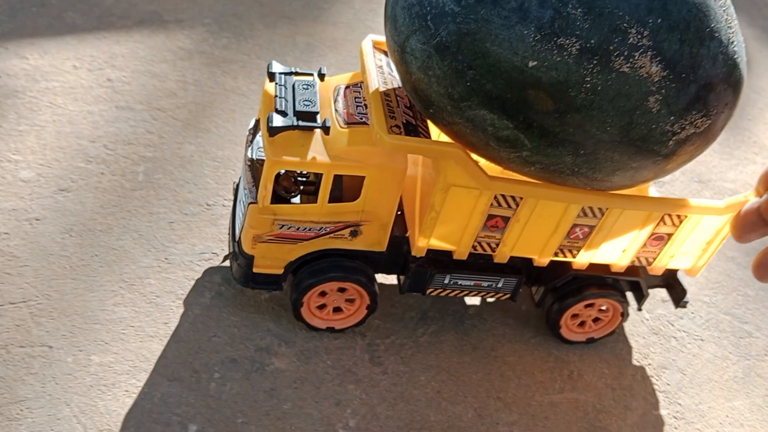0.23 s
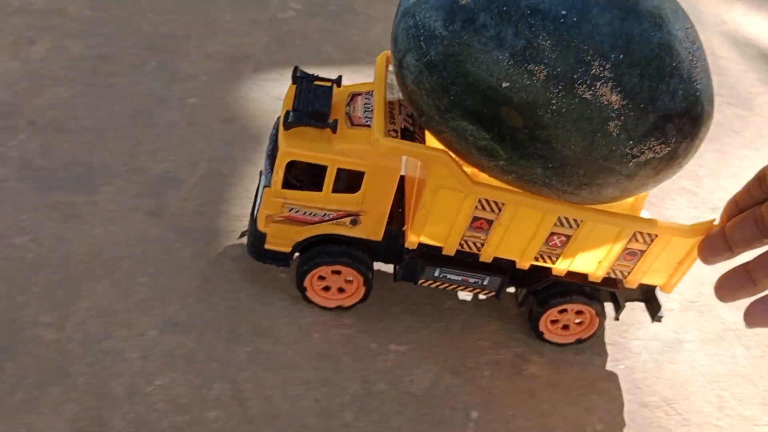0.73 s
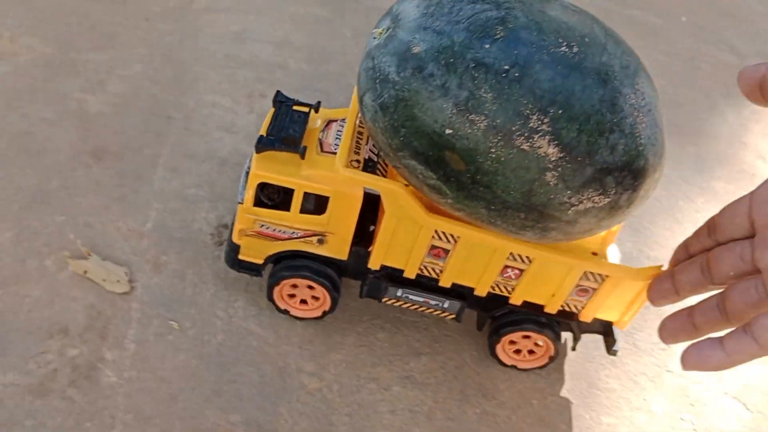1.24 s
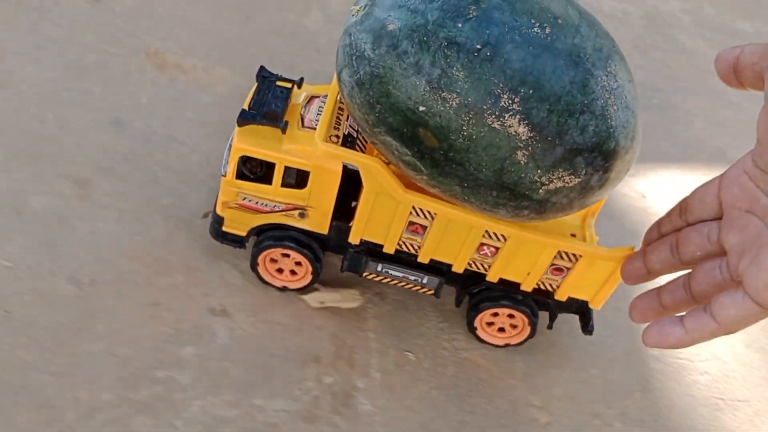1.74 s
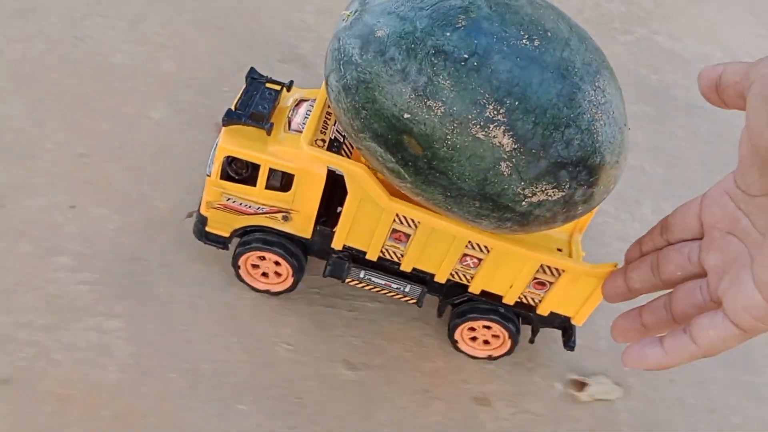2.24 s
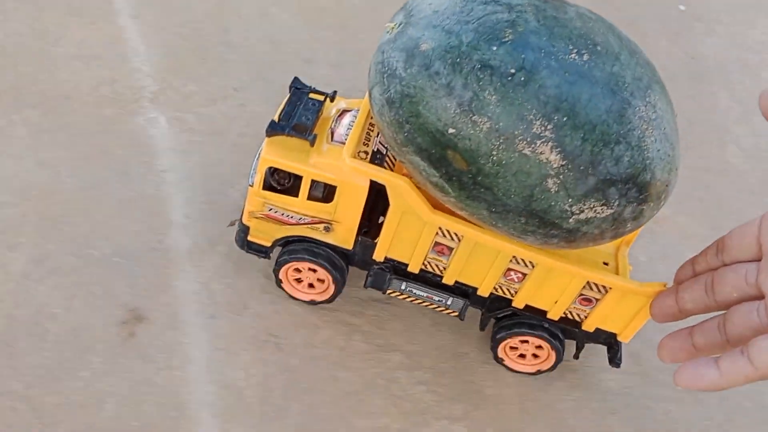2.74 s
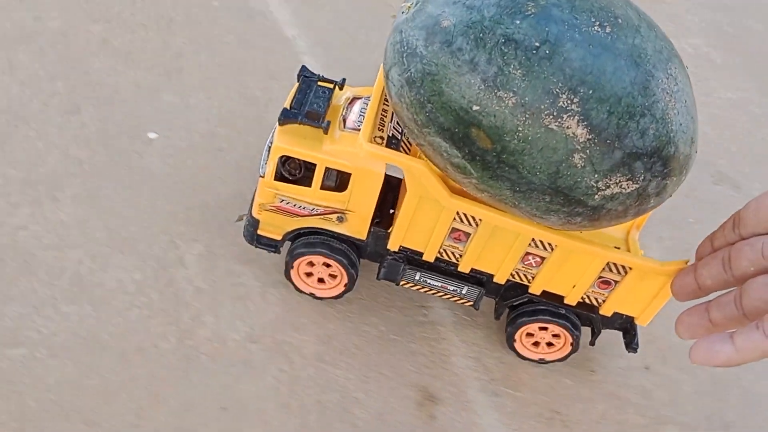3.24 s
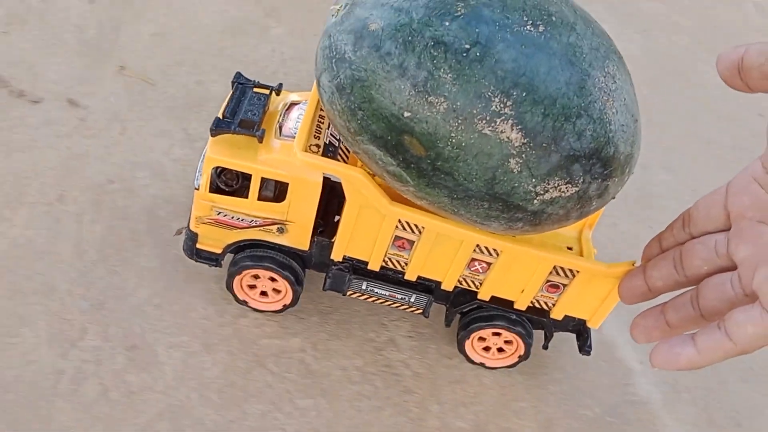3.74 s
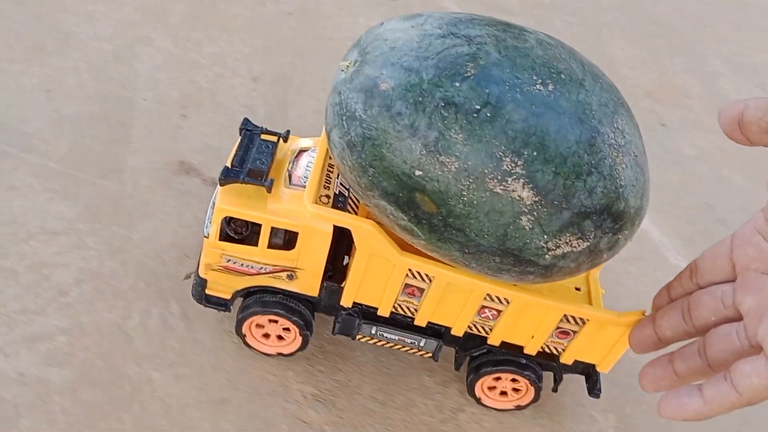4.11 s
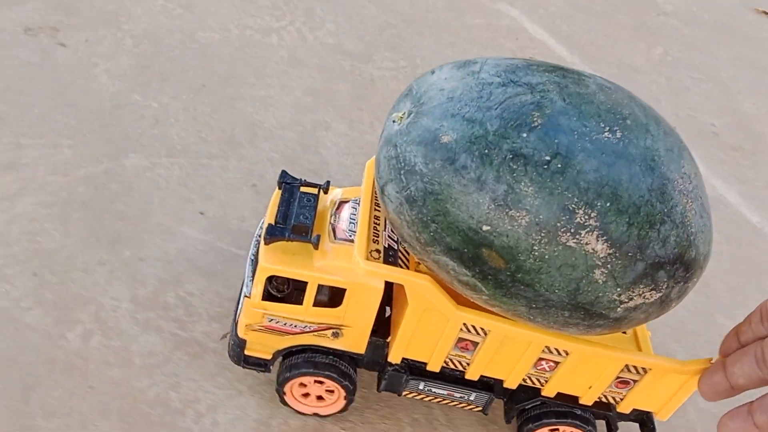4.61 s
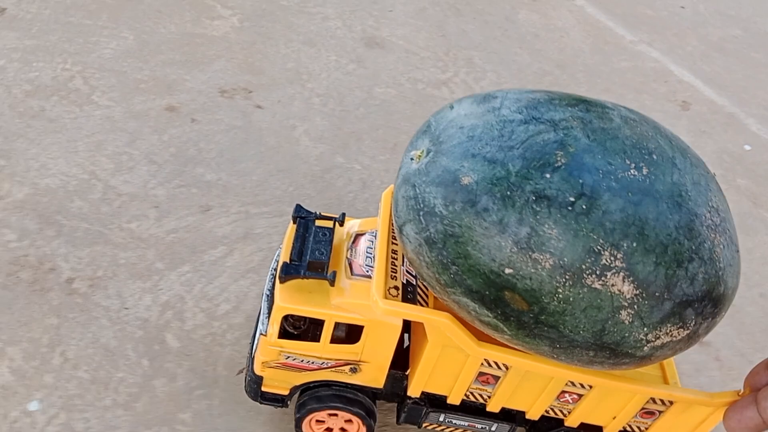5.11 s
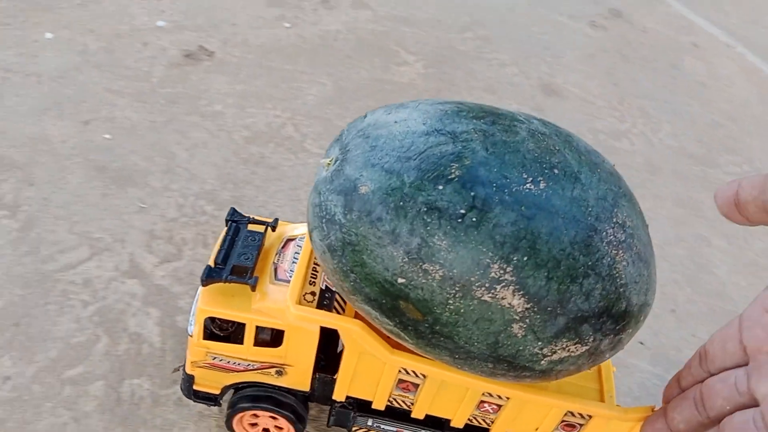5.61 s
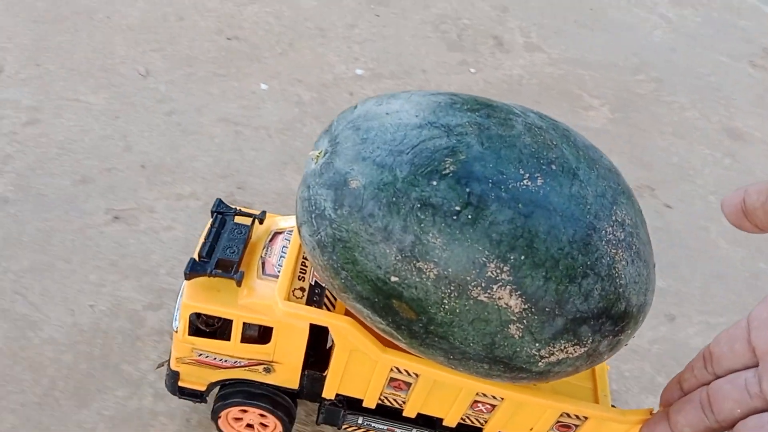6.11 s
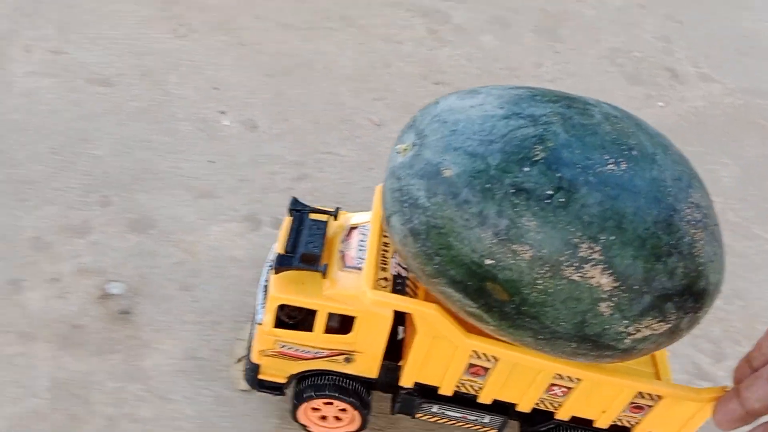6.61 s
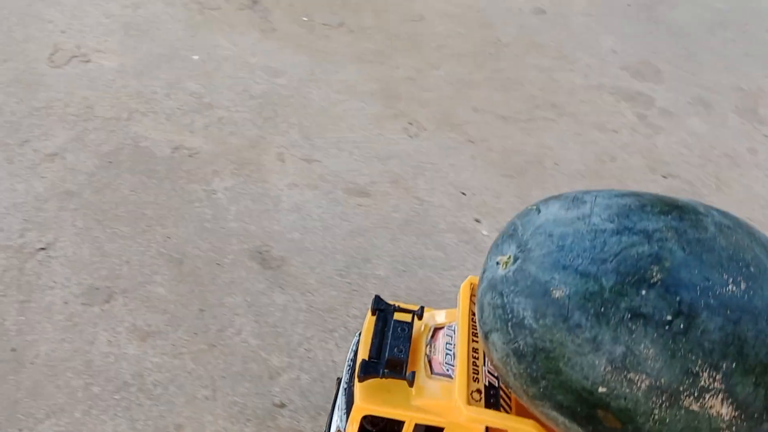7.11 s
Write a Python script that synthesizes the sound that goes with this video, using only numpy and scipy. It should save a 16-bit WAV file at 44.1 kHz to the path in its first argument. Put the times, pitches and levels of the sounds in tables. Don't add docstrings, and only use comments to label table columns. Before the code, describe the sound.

Hard hollow wheels clatter on rough concrete, shaking a thin plastic truck body under a heavy load. First come jerky bursts with small gaps, then about two seconds of continuous grinding rattle, a quiet pause, another steady run, and final brief shoves. Fine grit hisses and ticks, pebbles crack sharply, and faint low rumble sits in the open air, all close to one phone microphone.

```python
import sys
import numpy as np
from scipy import signal
from scipy.fft import rfft, irfft, next_fast_len
from scipy.io import wavfile
from scipy.ndimage import uniform_filter1d, map_coordinates

SR = 44100
rng = np.random.default_rng(int(sys.argv[2]) if len(sys.argv) > 2 else 0)


def convert_level_to_amplitude(level_db):
    exponent = np.asarray(level_db, float) / 20
    return 10 ** exponent


def unload_wav(signal):
    wavfile.write(
        sys.argv[1],
        SR,
        np.round(np.clip(np.atleast_2d(signal).T, -1, 1) * 32767).astype(np.int16),
    )


N = 324135

# (start [s], end [s], level at the start [dB], level at the end [dB])
ROLLS = [(0.096, 0.156, -46, -41), (0.2, 0.262, -55, -46), (0.28, 0.327, -40, -37),
         (0.336, 0.417, -49.5, -42), (0.48, 0.701, -41.5, -37.5), (0.778, 0.915, -39.5, -39),
         (0.978, 1.062, -45.5, -39), (1.261, 1.398, -54, -38), (1.416, 1.515, -36.5, -48.5),
         (1.846, 1.983, -51, -43.5), (2.073, 2.127, -52, -37), (2.129, 3.275, -38.5, -40),
         (3.289, 4.045, -36.5, -40.5), (4.046, 4.436, -42, -42), (4.93, 4.985, -55.5, -52),
         (5.07, 5.238, -50, -37.5), (5.258, 6.065, -39, -37.5), (6.194, 6.436, -41, -37.5),
         (6.768, 7.004, -45.5, -41.5), (7.176, 7.246, -57.5, -40.5), (7.25, 7.296, -38, -37)]
# (start [s], length [s], level [dB])
NUDGES = [(.008, 0.019, -45.5), (0.056, 0.0063, -52.5), (0.722, 0.01, -43), (1.157, 0.051, -55.5),
          (1.229, .03, -60.5), (1.537, 0.018, -59.5), (1.585, 0.019, -61), (1.996, 0.028, -56),
          (1.682, 0.02, -40), (4.661, 0.061, -53.5), (5.013, 0.011, -55.5), (6.067, 0.063, -53.5),
          (4.553, 0.0094, -64), (6.119, 0.011, -57), (6.139, 0.0066, -57), (6.548, 0.033, -71.5),
          (6.625, 0.059, -57.5), (7.108, 0.021, -69), (7.3, 0.057, -52.5)]
# (start [s], length [s], loss [dB])
HITCHES = [(2.199, 0.025, 8), (2.413, 0.021, 7.5), (2.743, 0.052, 2.5), (2.916, 0.017, 2),
           (3.088, 0.063, 11.5), (3.686, 0.056, 9.5), (3.865, 0.027, 5.5), (4.091, 0.017, 10),
           (4.158, 0.081, 1.5), (5.795, 0.029, 11), (5.985, 0.017, 11.5)]
# (time [s], peak level [dB])
JOLTS = [(0.014, -35), (0.05, -45), (0.092, -44), (0.102, -42), (0.184, -52), (0.209, -42), (0.226, -41),
         (0.249, -38), (0.282, -34), (0.371, -41.5), (0.415, -33.5), (0.727, -36), (1.16, -50),
         (1.183, -47), (1.585, -53.5), (1.656, -48), (1.747, -53.5), (1.816, -58), (1.841, -46),
         (1.935, -37), (2.039, -52), (2.069, -44.5), (3.136, -36.5), (4.114, -35), (4.45, -44.5),
         (4.599, -68), (4.627, -64), (4.653, -50), (4.916, -53), (5.09, -42), (6.118, -43), (6.126, -43),
         (6.146, -37.5), (6.185, -35.5), (6.556, -62), (6.613, -52), (6.743, -48), (6.753, -40),
         (6.832, -34.5), (7.069, -67), (7.116, -59.5), (7.164, -53), (7.181, -44), (7.222, -34.5),
         (7.329, -40)]
# (time [s], peak level [dB])
WHEEL_DROPS = [(0.012, -30), (0.094, -53), (0.101, -47), (0.254, -44), (0.41, -27), (0.463, -50),
               (0.474, -28), (.697, -22), (0.755, -32), (.811, -26), (1.051, -24), (1.302, -32),
               (1.506, -35.5), (2.222, -49), (2.545, -18.5), (2.618, -21), (3.155, -44), (3.282, -22),
               (3.499, -18), (3.902, -25), (4.468, -43.5), (4.566, -56), (4.81, -52), (4.85, -47.5),
               (4.973, -28), (5.819, -23), (5.876, -28), (6.019, -23), (6.058, -17.5), (6.185, -51),
               (7.181, -60), (7.22, -36)]
# (middle [s], length [s], gain over its usual share [dB])
LOAD_ROCKS = [(0.24, 0.048, 8), (0.903, .15, -1.5), (2.367, 0.068, 11), (2.707, 0.087, 11.5),
              (3.026, 0.11, 20.5), (3.495, 0.21, 13), (3.95, 0.11, 14.5), (4.284, 0.16, 24),
              (5.437, 0.19, 11.5), (5.705, 0.38, 17), (6.002, 0.1, 4), (6.354, 0.087, 10),
              (6.842, 0.055, 25.5), (7.238, 0.08, 11.5)]

# (frequency [Hz], width [Hz], level [dB])
SHELL = [(1719, 300, 6.5), (2009, 97, 6), (2207, 294, 4.5), (2490, 315, -1), (2726, 157, -0.5),
         (3196, 315, 0.5), (3159, 75, -1.5), (3525, 260, -5), (3738, 320, -13), (4368, 110, -20),
         (4330, 98, -14), (4500, 130, -43), (5420, 160, -32), (5890, 270, -21.5), (6795, 150, -3.5),
         (6790, 136, -10.5), (7700, 790, -16)]
HUBS = [(975, 110, -1), (1040, 120, 0)]
FRAME = [(1190, 170, -2), (1350, 190, 0), (1510, 170, -3)]
CAB = [(643, 82, -1), (866, 306, 10)]
BED = [(500, 70, 0)]
LOAD = [(251, 28, 0), (340, 90, -16)]
# (frequency [Hz], width [Hz], level [dB])
BED_LOOSE = [(589, 85, 3.5), (384, 90, -16)]

# (time [s], level against the push [dB])
LEAN = [(0, -6), (.37, -13), (.6, -10), (1.1, -6.5), (1.3, -1.5), (2.0, -6), (2.2, -12.5), (2.5, -7.5),
        (2.8, -1), (3.2, 0), (3.65, -11.5), (4.4, 0.5), (5.1, -9.5), (5.7, -10), (5.9, 0.5), (6.5, -5),
        (6.7, -5), (7.35, -10)]
# (time [s], level against the push [dB])
SEAT = [(0, -21), (.5, -30.5), (.88, -11.5), (1.0, -19), (1.5, -18), (1.7, -16), (1.9, -28), (2.2, -16),
        (2.6, -7.5), (3.2, -25), (3.5, -8), (3.95, -12), (4.1, -19), (4.4, -9.5), (4.7, -21.5),
        (5.85, -7.5), (6.2, -12.5), (6.5, -8), (7.35, -13)]
# (time [s], level [dB])
FACING = [(0, -2.5), (1.0, -1), (1.2, 3.5), (1.5, -2), (2.8, -0.5), (3.6, -1), (5.4, -0.5), (6.4, -1),
          (6.6, 4.5), (7.03, 0), (7.18, -1), (7.35, 2.5)]
# (time [s], level [dB])
FINGERS = [
    (0, 10),
    (1.15, 7),
    (1.7, -6),
    (2.1, 4.5),
    (3.2, 5.5),
    (3.7, 0.5),
    (5.1, 3),
    (6.2, 4),
    (7.0, 2.5),
]

# (time [s], level against the push [dB])
GRIT = [
    (0, -16.5),
    (1.2, -14.5),
    (2.5, -14.5),
    (4.4, -15),
    (5.3, -15.5),
    (6.0, -16.5),
    (6.8, -9),
    (7.35, -14.5),
]
# (frequency [Hz], level per Hz [dB])
CRUNCH = [(3820, -34), (6500, -8.5), (7600, -6.5), (10000, 2), (11700, -1), (13300, -3), (14000, -13),
          (15600, -7.5)]
# (time [s], peak level [dB], pitch [Hz])
STONE_SNAPS = [(.2808, -52, 10100), (.5786, -33, 8600), (.601, -36, 6550), (.6854, -31.5, 7340),
               (1.3024, -32, 11800), (1.3633, -38, 11300), (1.502, -37, 13000), (1.7874, -40, 7300),
               (2.09, -42, 7000), (2.136, -35, 9350), (2.2972, -31, 11900), (2.449, -31.5, 11000),
               (2.5444, -30, 12300), (2.616, -32, 11750), (2.6803, -29, 12000), (2.6801, -23.5, 5560),
               (2.6805, -34, 7200), (2.796, -29.5, 7700), (3.019, -32, 10700), (3.2136, -37, 10800),
               (3.2137, -37, 7000), (3.754, -32, 11000), (3.839, -34, 10100), (4.4513, -39, 10400),
               (4.5518, -29, 7710), (4.552, -36, 13600), (4.7227, -37, 7700), (4.846, -48, 10400),
               (5.468, -33, 12800), (5.479, -28, 7950), (5.488, -26, 7150), (5.6141, -31, 12550),
               (5.8223, -36, 9900), (6.331, -28, 11200), (6.3315, -41, 5200), (6.3312, -40, 6900),
               (7.209, -40, 12100), (7.2085, -40, 5000)]
# (time [s], peak level [dB], pitch [Hz])
GRIT_TICKS = [(0.0921, -44, 10500), (0.1216, -46, 10700), (0.1374, -57, 10500), (0.185, -51, 10100),
              (0.3304, -44, 10500), (0.3929, -47, 10000), (0.4682, -46, 10000), (0.7251, -39, 11700),
              (0.8239, -44, 10200), (0.9003, -44, 10100), (1.027, -53, 7040), (1.1417, -53, 10300),
              (1.229, -53, 10200), (1.4465, -43, 10100), (2.176, -44, 10100), (2.2302, -45, 10800),
              (2.4936, -39, 11600), (2.7002, -38, 11700), (2.8743, -47, 10800), (3.2439, -37, 11600),
              (3.3058, -39, 10600), (3.668, -38, 11700), (3.896, -44, 10000), (4.0092, -45, 10400),
              (4.12, -45, 10800), (4.2762, -41, 10900), (4.359, -54, 9640), (4.4054, -44, 10900),
              (4.5111, -65, 9880), (4.5221, -64, 7670), (4.5999, -64, 10430), (4.6279, -64, 8590),
              (4.6723, -53, 10000), (4.7064, -53, 10100), (4.7925, -59, 10500), (4.808, -53, 12400),
              (5.0538, -50, 12700), (5.111, -46, 12900), (5.3706, -42, 12800), (5.678, -33, 12600),
              (6.0032, -45, 10100), (6.022, -45, 10100), (6.1235, -60, 10600), (6.2955, -46, 9600),
              (6.6338, -42.5, 7800), (6.75, -54, 9940), (6.8313, -44, 12800), (6.8965, -38, 8500),
              (6.9994, -44, 7300), (7.2613, -53, 10600)]

# (start [s], end [s], frequency [Hz], gain [dB])
GAPS = [(0.676, 0.786, 1550, -5), (1.64, 1.74, 2060, -11), (1.64, 1.74, 3440, -13),
        (1.64, 1.74, 4177.0, -1), (1.83, 1.94, 1880, -1), (1.83, 2.01, 2870, -3), (2.052, 2.59, 1790, -9.0),
        (2.07, 2.25, 734, -18), (2.46, 2.747, 754, -19), (2.707, 2.943, 2900, -12),
        (2.75, 2.85, 4220.0, -8.0), (3.177, 3.382, 2940, -15), (3.22, 3.41, 4177.0, -15),
        (3.383, 3.516, 1820, -6), (3.39, 3.62, 660, -9), (3.577, 3.908, 1820, -14),
        (3.91, 4.034, 825, -10.0), (4.055, 4.217, 3014.0, -22), (4.114, 4.442, 4040, -10.0),
        (4.127, 4.49, 760, -4), (4.28, 4.38, 2710, 4), (5.063, 5.233, 856, -13),
        (5.058, 5.443, 2670.0, -16), (5.244, 5.508, 4134.0, -2), (5.511, 6.148, 770, -7),
        (5.572, 5.713, 1740, -8), (6.1, 6.243, 2970, -3), (6.148, 6.31, 4240, -12), (6.155, 6.32, 2610, -4),
        (6.73, 6.887, 1130, -29), (6.73, 7.04, 2680, -11), (6.904, 7.037, 865, -19),
        (7.16, 7.333, 2460, -7), (7.16, 7.35, 735, -20)]
# (start [s], end [s], frequency [Hz], width [Hz], gain [dB])
RINGS = [(0, 0.276, 1405, 65, 6.5), (.03, 0.083, 1480, 120, 7.5), (0.5, 0.28, 1450, 130, 2),
         (0.9, .75, 1300, 100, 3), (5, 5.04, 3100, 100, 7), (5.5, 6.25, 490, 90, -7),
         (1.1, 1.62, 860, 90, 7), (2.56, 2.6, 1050, 130, -2), (3, 3.12, 470, 70, 8),
         (3.5, 3.35, 1260, 96, -2), (4, 4.5, 380, 92, -5.5), (4.5, 4.52, 930, 75, 7),
         (4.5, 4.72, 2350, 110, 8.5), (4.64, 4.75, 920, 57, 9), (4.5, 5.3, 6000, 510, -6),
         (5, 6.2, 5800, 350, -4), (5.5, 5.8, 1080, 82, -6), (6.5, 6.7, 474, 49, -6),
         (5.5, 6.3, 790, 115, -7.5), (6.46, 6.52, 900, 73, 9), (6, 7.1, 850, 120, 3.5),
         (7, 6.75, 3360, 130, 9.5), (6.72, 6.87, 3200, 110, 8.5), (6.5, 7.1, 1820, 120, 6),
         (6.52, 6.8, 960, 73, -1), (7.0, 7.35, 5400, 440, -5), (7, 7.7, 1380, 110, 3.5),
         (5.5, 6.19, 1170, 100, 5), (3, 3.5, 1103, 91, -7.5), (4.5, 5.03, 1100, 93, -8),
         (5, 5.48, 360, 41, -9), (3.5, 3.8, 630, 46, -6), (6.96, 7.2, 1070, 92, -5),
         (6.6, 6.72, 2350, 120, 6), (6, 6.74, 2670, 200, -10), (0.5, 0.47, 1420, 76, 8),
         (2.5, 2.95, 1070, 94, -4.5), (2.5, 2.68, 430, 60, 6.5), (.62, .95, 487, 35, 5),
         (-0.5, 0.43, 3150, 150, 4.5), (6, 6.44, 1260, 230, -4.5), (2.5, 2.6, 2100, 150, 2)]

# (time [s], level [dB])
WIND = [(0.0, -77.5), (0.61, -78), (1.94, -86.5), (2.31, -63), (2.35, -72), (3.09, -68.5), (3.13, -76.5),
        (3.68, -66.5), (4.17, -78), (4.28, -74), (4.62, -85.5), (6.02, -58.5), (6.24, -72.5), (6.41, -62),
        (6.55, -88), (7.02, -65), (7.04, -79), (7.35, -81)]
# (frequency [Hz], level per Hz [dB])
RUMBLE = [(12, -46), (20, -32), (38, -16.5), (75, -1), (129, 0), (184, -7.5), (220, -6), (290, -59),
          (480, -120)]
# (frequency [Hz], level per Hz [dB])
AIR = [(15, -32), (25, -36), (123, 3.5), (451, -5), (607, -4), (754, -6), (962, -14), (1130, -41),
       (1610, 7), (4140, -102), (6210, -34), (7710, -4.5), (11300, -79), (13600, -24), (16000, -1)]

# (frequency [Hz], width [Hz], gain [dB])
NOTCH = (4890, 110, -22)
# (time [s], share [0 = not at all, 1 = usual])
NOTCH_FILL = [(0, 1.8), (.5, 0.41), (1.1, 0.45), (2, 1.4), (2.3, .9), (2.9, 1.3), (3.4, 0.96), (4.15, 1.3),
              (4.3, .4), (4.7, .7), (5.2, 0.74), (5.5, .8), (5.85, 2.3), (6.3, 1.5), (6.7, 0.76),
              (6.95, 0.98), (7.35, 0.64)]
# (frequency [Hz], width [Hz], gain [dB])
PORT_PEAKS = [(10100, 145, 4.5), (11700, 150, 0.5), (12800, 380, 3.5), (14000, 420, -2), (6450, 220, -4)]

PIVOT_DB = -57
TOP_HZ = 15640


def wheels():
    push_db = push()
    hubs_db, bed_db, facing_db = curve(LEAN), curve(SEAT), curve(FACING)
    frame_db = -10 - 0.4 * hubs_db - 0.41 * facing_db
    cab_db = -15 - 0.27 * bed_db + curve(FINGERS)
    load_db = push_db - 34 + rocking()

    texture = convert_level_to_amplitude(0.4 * wobble(25) + 0.7 * wobble(70))
    pebbles = np.minimum(grains(900, spread_db=2.5), 2.6) * rng.choice([-1, -1, 1], N)
    roughness = unit(unit(pebbles) + 0.45 * rng.standard_normal(N))
    drops = knocks() / convert_level_to_amplitude(push_db)
    bumps = texture * roughness - drops
    rear = texture * np.roll(roughness, SR // 3) - drops

    truck = shaken(bumps, push_db + facing_db - 6.5, SHELL)
    truck += shaken(bumps, load_db - 0.8, LOAD)
    wander_db = 5 * wobble(7)
    truck += shaken(rear, push_db + bed_db - 6.5 - wander_db, BED_LOOSE)
    truck += shaken(bumps, push_db + bed_db + wander_db - 0.5, BED)
    truck += shaken(rear, push_db + cab_db - 8, CAB)
    truck += shaken(bumps, push(spin_db=6) + hubs_db + 0.11, HUBS)
    truck += shaken(bumps, push_db + frame_db + 0.35, FRAME)
    gentle_db = 0.4 * np.minimum(push_db + 42, 0)
    return truck + thud(bumps, push_db + facing_db - 7 + gentle_db)


def push(spin_db=0):
    rise, stop, settle = 588, 1284, 213
    stop_db = 20.5 - spin_db
    hitch_edge = 0.009
    jolt_db, jolt_hold, jolt_rise, jolt_fall = -6, 0.005, 7000, 1800

    t = np.arange(0, N + 32, 32) / SR
    level = -75.5
    creeps = [(start, start + length, db, db) for start, length, db in NUDGES]
    for start, end, first, last in [*ROLLS, *creeps]:
        after = np.maximum(t - end, 0)
        loss = rise * np.maximum(start - t, 0)
        loss = loss + np.minimum(stop * after, stop_db + settle * after)
        level = np.maximum(level, np.interp(t, [start, end], [first, last]) - loss)
    for start, length, db in HITCHES:
        level = level - db * window(t, start, start + length, hitch_edge)
    for s, db in JOLTS:
        loss = jolt_rise * np.maximum(s - t, 0) + jolt_fall * np.maximum(t - s - jolt_hold, 0)
        level = np.maximum(level, db + jolt_db - loss)
    return np.interp(np.arange(N) / SR, t, level)


def knocks():
    blows = np.zeros(N)
    jolt_starts = [(s, db + 5) for s, db in JOLTS]
    for s, db in [*WHEEL_DROPS, *jolt_starts]:
        blows[round(s * SR)] = convert_level_to_amplitude(db + 11)
    return filtered(blows, lambda hz: 1 / (1 + 1j * hz / 3000) ** 2)


def rocking():
    t = np.arange(N) / SR
    return sum(db * np.exp(-2 * ((t - middle) / length) ** 2) for middle, length, db in LOAD_ROCKS)


def shaken(force, db, modes):
    power = sum(width * convert_level_to_amplitude(2 * level) for _, width, level in modes)
    norm = np.sqrt(np.pi / SR * power)

    def response(hz):
        total = 0
        for k, (centre, width, level) in enumerate(modes):
            wide = max(width, centre / 30)
            peak = resonance(hz, centre, wide) * resonance(hz, centre, 3.48 * wide) ** 2
            total = total + (-1) ** k * convert_level_to_amplitude(level) * peak
        return total

    return filtered(force * convert_level_to_amplitude(db) / norm, response)


def thud(force, db):
    return filtered(force * convert_level_to_amplitude(db), lambda hz: resonance(hz, 1700, 1690) * resonance(hz, 810, 6330) ** 2)


def sand():
    t = np.arange(SR // 40) / SR
    bursts = signal.fftconvolve(np.minimum(grains(70, spread_db=4), 4), fading(t, 0.035))[:N]
    pops = signal.fftconvolve(np.minimum(grains(260, spread_db=5), 6), fading(t, 0.006))[:N]
    crush = 0.45 + 0.55 * unit(bursts) + 0.75 * unit(pops)
    rustle = patchy(crush * rng.standard_normal(N), size=128, bins=10, frames=3, depth_db=0.5, lift=2.8)
    rustle = filtered(coloured(rustle, CRUNCH), lambda hz: low_cut(hz, 6450, 24))
    crunch_db = PIVOT_DB + 0.84 * (push() - PIVOT_DB) + curve(GRIT)
    crunch = convert_level_to_amplitude(crunch_db - 3.5) * unit(rustle)
    at_rest = convert_level_to_amplitude(-81.5) * unit(filtered(rustle, lambda hz: low_cut(hz, 7500, 24)))
    return crunch + at_rest


def stones():
    out, t = np.zeros(N + SR), np.arange(SR // 20) / SR
    when, size, pitch = rng.random((60, 3)).T
    work_db = push()[(when * N).astype(int)]
    chip_db = work_db + 2 * np.minimum(work_db - PIVOT_DB, 0) - 28 + 16 * (2 * size - 1)
    chips = zip(when * N / SR, chip_db, 10000 + 2800 * pitch)
    ticks = [(s, db + 3, hz) for s, db, hz in GRIT_TICKS]

    for s, db, hz in [*STONE_SNAPS, *ticks, *chips]:
        fade = fading(t, 0.012) * (1 - np.exp(-t / 0.0012))
        crack = np.diff(rng.standard_normal(len(t) + 1)) * 0.17 * convert_level_to_amplitude(db + 40) ** 0.3
        slow_noise = uniform_filter1d(rng.standard_normal(len(t)), size=32)
        ring = slow_noise * 6 * np.sin(2 * np.pi * hz * t)
        out[round(s * SR):][:len(t)] += convert_level_to_amplitude(db - 3) * fade * (crack + ring)

    def band(hz):
        above_top = convert_level_to_amplitude(-27) * (hz < 16600)
        return np.where(hz < TOP_HZ, 1, above_top) * low_cut(hz, 5000, 14)

    return filtered(out[:N], band)


def yard(x):
    t = np.arange(SR // 5) / SR
    tail = rng.standard_normal(len(t)) * fading(t, 0.16)
    x = x + convert_level_to_amplitude(-19) * signal.fftconvolve(x, tail / np.linalg.norm(tail))[:N]
    return patchy(cancel(x, gaps), size=512, bins=2, frames=16, depth_db=4.8, lift=1)


def gaps(hz, t):
    rows = [(start, end, centre, 45 + 0.011 * centre, db) for start, end, centre, db in GAPS]
    return sum(db * window(t, start, end, 0.035) / (1 + ((hz - centre) / width) ** 2)
               for start, end, centre, width, db in [*rows, *RINGS])


def ground():
    return convert_level_to_amplitude(curve(WIND) + 4.3 * wobble(13)) * unit(coloured(rng.standard_normal(N), RUMBLE))


def air():
    ticks = signal.fftconvolve(grains(40, spread_db=3), fading(np.arange(400) / SR, 0.01))[:N]
    settling = 1 + 1.1 * unit(ticks)
    swell = convert_level_to_amplitude(1.5 * wobble(15))
    return convert_level_to_amplitude(-67.5) * swell * unit(coloured(settling * rng.standard_normal(N), AIR))


def port(x):
    notch_hz, width, db = NOTCH
    centre = notch_hz + 50 * wobble(6.5)
    share = np.maximum(curve(NOTCH_FILL) + 0.6 * wobble(9), 0)

    def peaks(hz):
        return convert_level_to_amplitude(sum(level / (1 + ((hz - top) / wide) ** 2) for top, wide, level in PORT_PEAKS))

    def notch(hz, t):
        i = np.minimum(t * SR, N - 1).astype(int)
        return db * share[i] / (1 + ((hz - centre[i]) / width) ** 2)

    return cancel(filtered(x, peaks), notch)


def unit(x):
    return x / np.sqrt(np.mean(x ** 2) + 1e-20)


def curve(rows):
    s, value = np.transpose(rows)
    return np.interp(np.arange(N) / SR, s, value)


def window(t, start, end, edge):
    return np.clip(np.minimum(t - start, end - t) / edge + 0.5, 0, 1)


def fading(t, length):
    return convert_level_to_amplitude(-60 * t / length)


def wobble(rate):
    coarse = np.arange(0, N + 64, 64)
    points = rng.standard_normal(int(N * rate / SR) + 4)
    return np.interp(np.arange(N), coarse, map_coordinates(points, [coarse * rate / SR]))


def grains(rate, spread_db):
    hit = rng.random(N) < rate / SR
    return hit * convert_level_to_amplitude(np.minimum(spread_db * rng.exponential(size=N), 25))


def filtered(x, response):
    m = next_fast_len(N + 8192)
    return irfft(rfft(x, m) * response(np.fft.rfftfreq(m, 1 / SR)), m)[:N]


def coloured(x, points):
    f, db = np.transpose(points)
    return filtered(x, lambda hz: convert_level_to_amplitude(np.interp(np.log(hz + 1), np.log(f), db)))


def low_cut(hz, corner, steepness):
    return 1 / (1 + (corner / (hz + 1)) ** steepness)


def resonance(hz, centre, width):
    return 1j * hz * width / (centre * centre - hz * hz + 1j * hz * width)


def patchy(x, size, bins, frames, depth_db, lift):
    z = signal.stft(x, nperseg=size)[2]
    field = rng.standard_normal(z.shape)
    for _ in range(2):
        field = uniform_filter1d(field, size=bins, axis=0)
        field = uniform_filter1d(field, size=frames, axis=1)
    gain = convert_level_to_amplitude(depth_db * np.minimum(unit(field), lift))
    return signal.istft(z * gain, nperseg=size)[1][:N]


def cancel(x, gain_db):
    hz, t, z = signal.stft(x, SR, nperseg=1024)
    return signal.istft(z * convert_level_to_amplitude(gain_db(hz[:, None], t)), SR, nperseg=1024)[1][:N]


def scene():
    steady = yard(wheels() + sand()) + ground() + air()
    steady = filtered(steady, lambda hz: hz < TOP_HZ)
    return port(steady + stones())[None]


def top_cut(x):
    return signal.sosfilt(signal.butter(12, 16460, fs=SR, output="sos"), x)


def record(dry):
    return top_cut(dry)


dry = scene()
out = record(dry)
unload_wav(out)
```